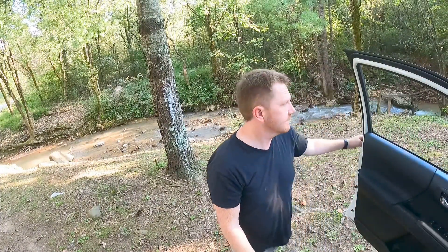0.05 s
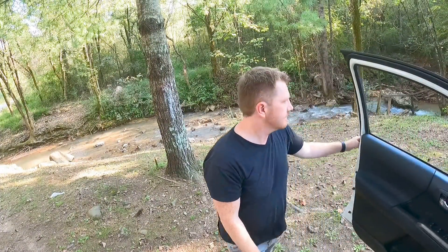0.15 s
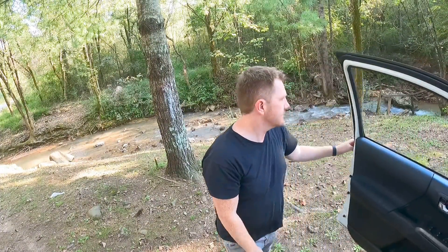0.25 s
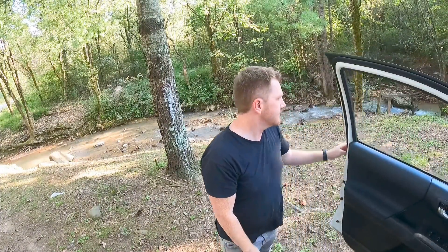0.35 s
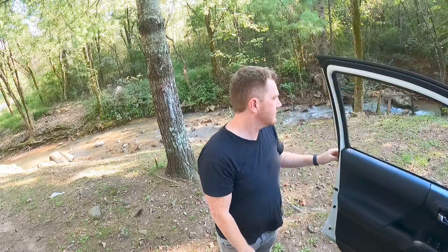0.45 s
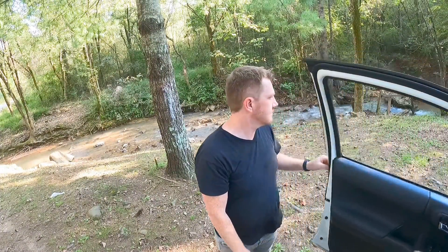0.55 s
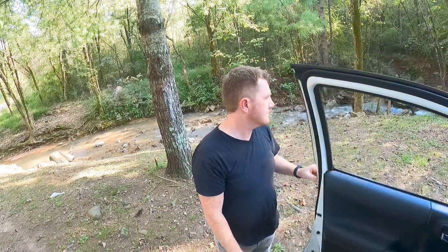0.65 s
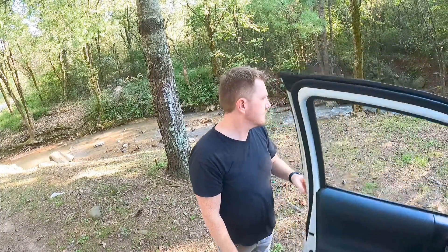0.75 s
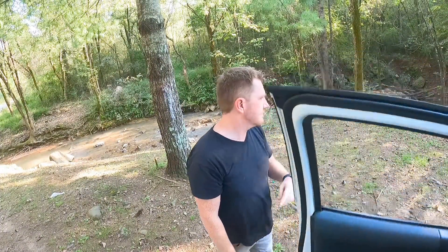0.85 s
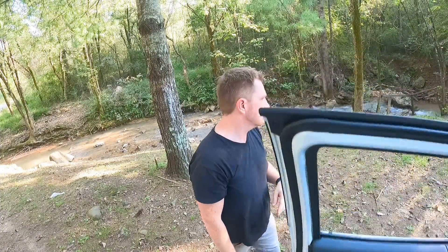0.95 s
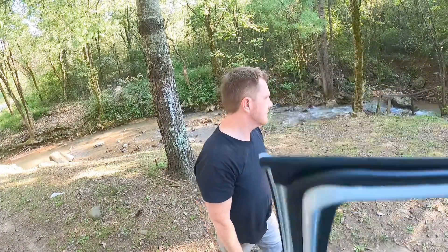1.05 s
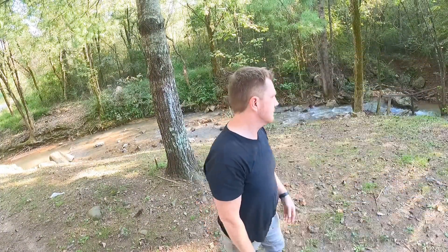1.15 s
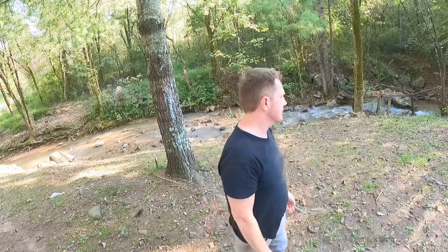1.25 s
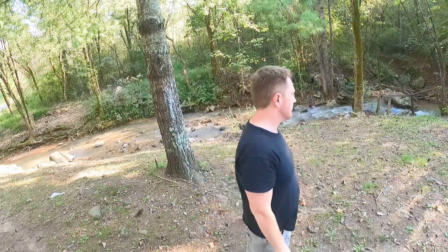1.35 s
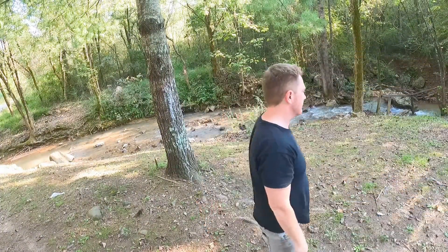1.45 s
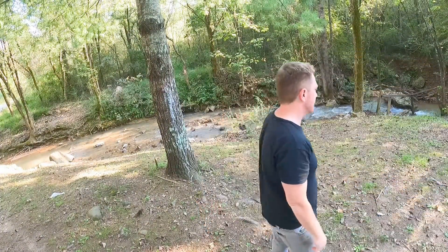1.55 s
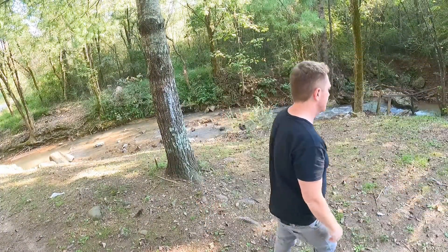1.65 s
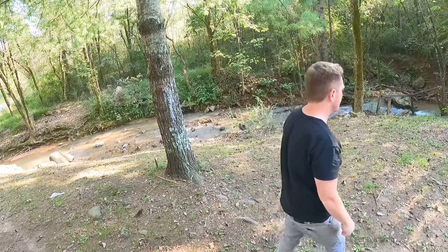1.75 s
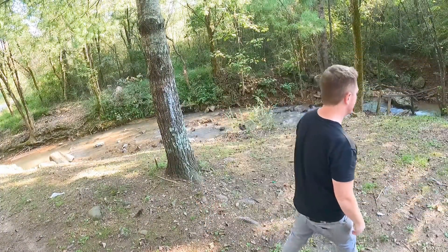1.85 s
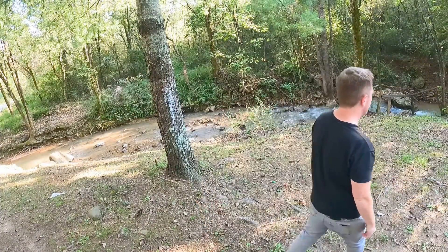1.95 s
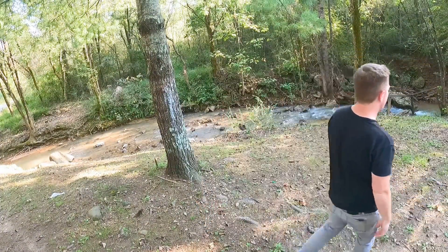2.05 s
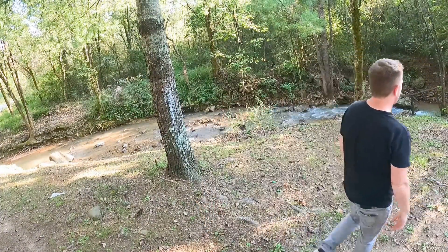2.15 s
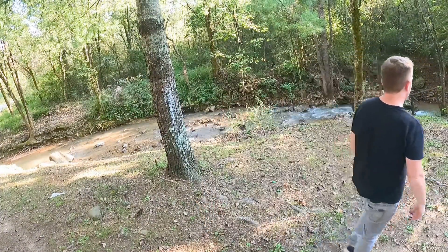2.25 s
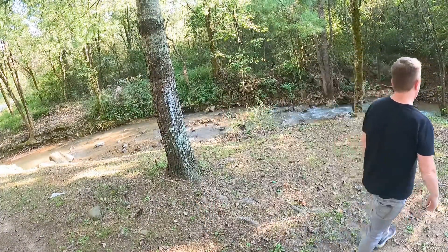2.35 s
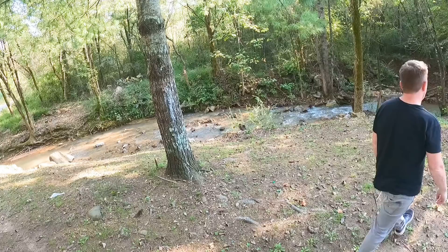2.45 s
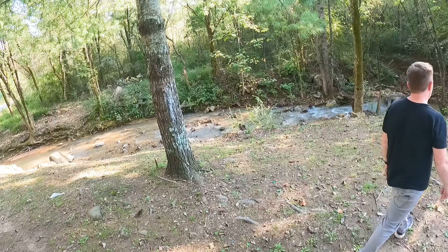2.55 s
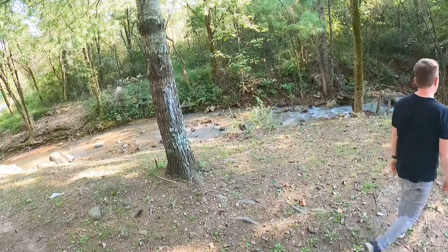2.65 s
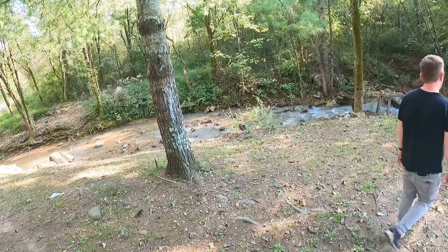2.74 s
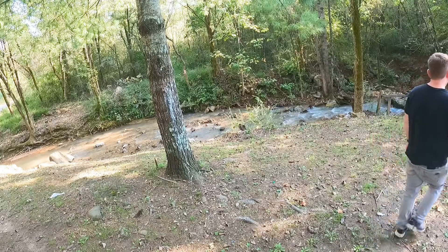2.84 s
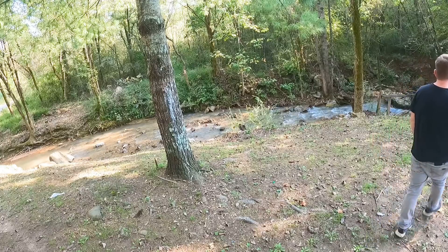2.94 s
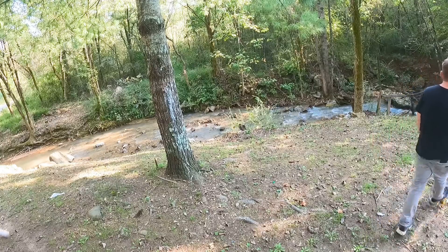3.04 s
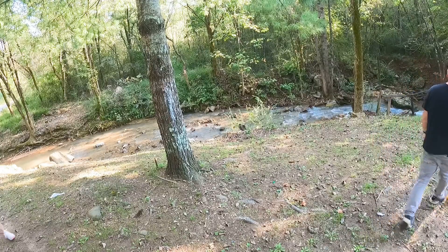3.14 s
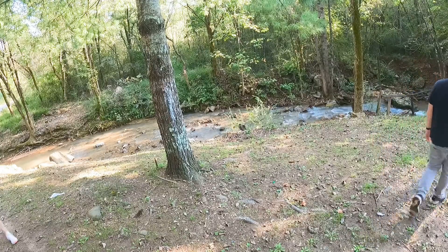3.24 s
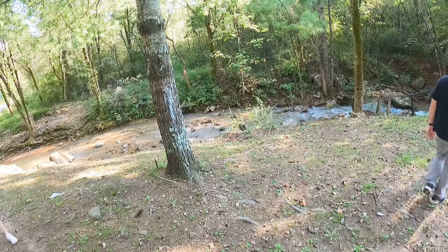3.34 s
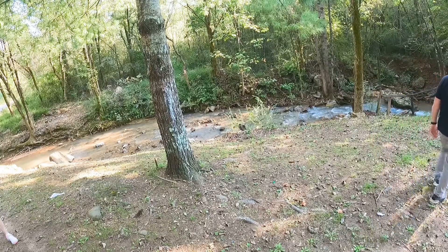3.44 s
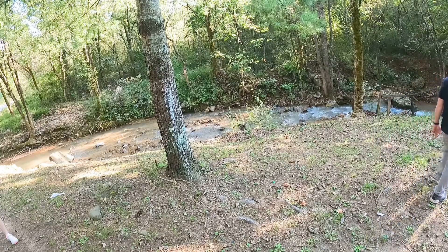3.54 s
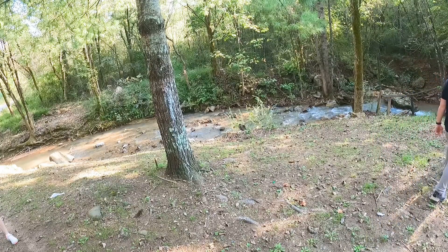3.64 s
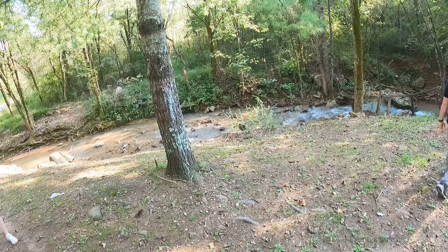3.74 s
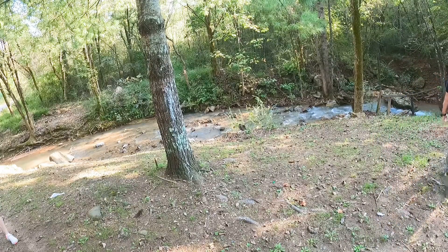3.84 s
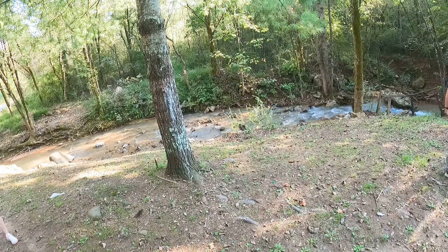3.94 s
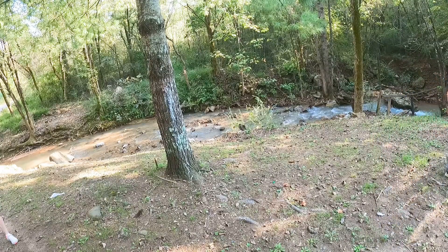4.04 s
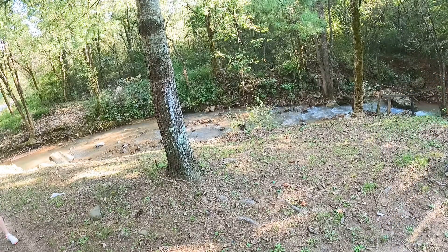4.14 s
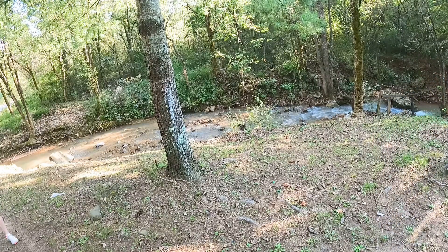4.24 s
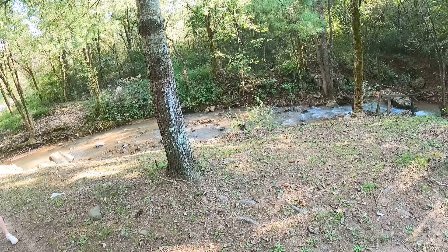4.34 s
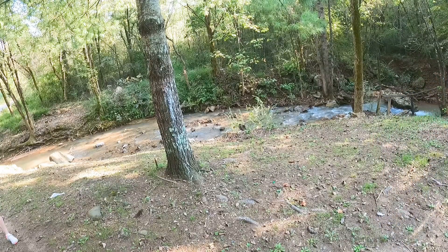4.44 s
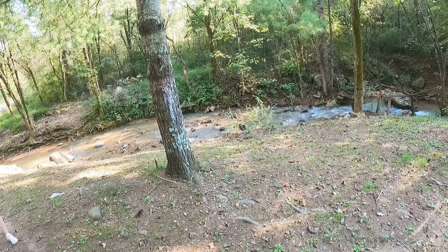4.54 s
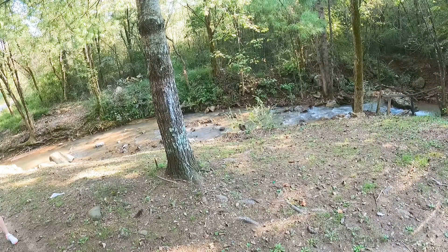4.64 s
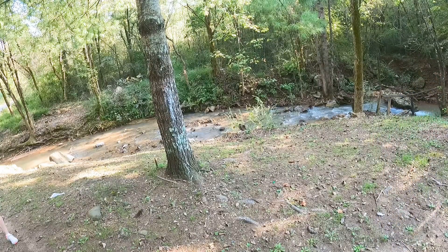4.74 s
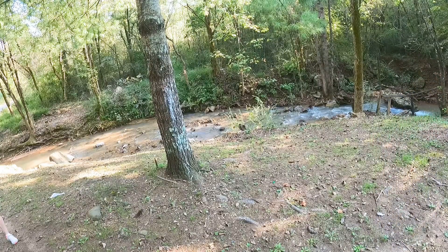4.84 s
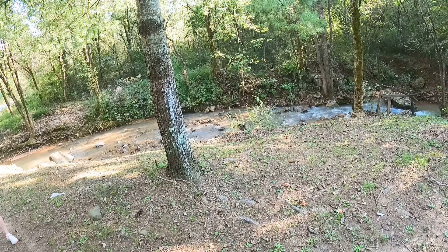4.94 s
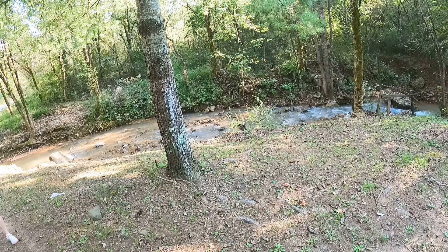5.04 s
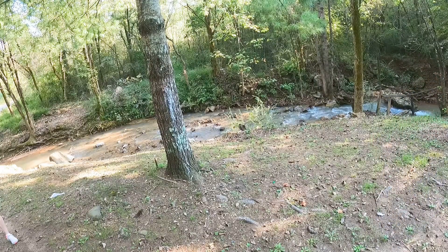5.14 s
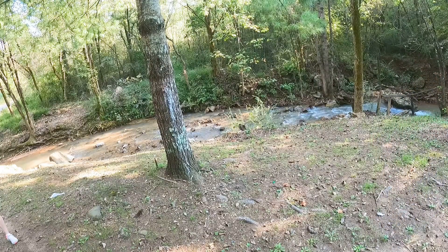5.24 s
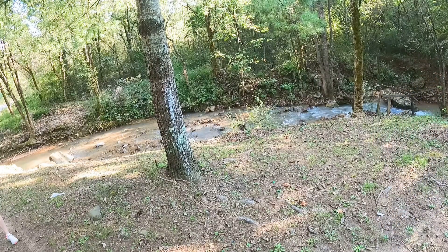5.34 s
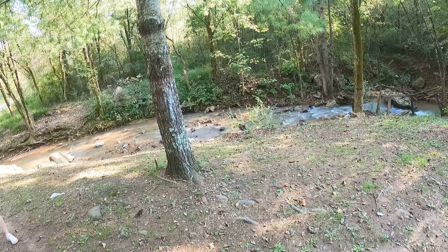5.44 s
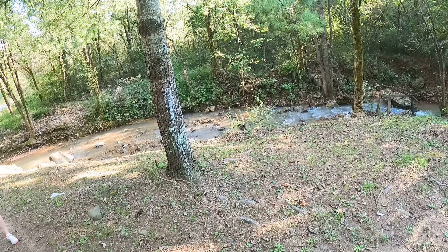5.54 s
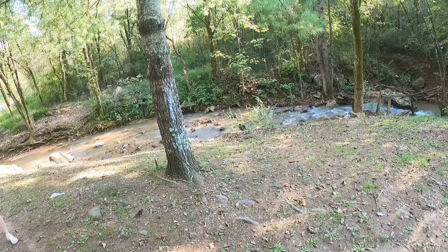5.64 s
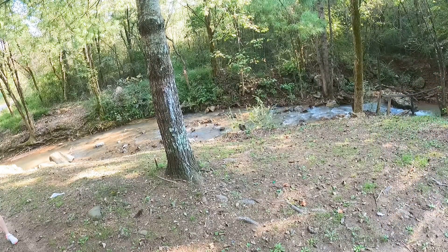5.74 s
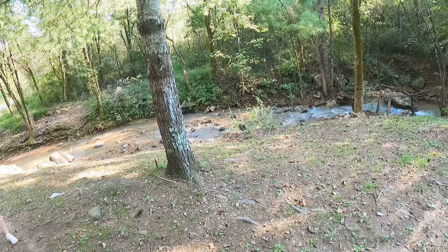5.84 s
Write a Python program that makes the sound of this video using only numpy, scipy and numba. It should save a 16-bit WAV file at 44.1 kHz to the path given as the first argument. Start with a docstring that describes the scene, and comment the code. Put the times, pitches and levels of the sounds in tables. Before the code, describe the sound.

A shallow creek rushes over stones throughout, a soft broadband wash with low rumble, bubbling and fine spray, slightly duller and narrower at first. Faint dry scuffs and cracks of leaf litter come around 0.3 to 0.6 seconds, a short low creak at 0.9, and a tiny microphone tap at 1.1. At about 1.35 a car door slams close by, slightly right: a quick latch clack, a heavy panel thud, brief trim rattle, and a deep cabin boom gone by about 1.8, with a short dull woodland tail. The camera's automatic gain dips the water, which creeps back as the image widens. Small grit or twig cracks tick at 1.6, 1.8, 3.25, 3.7 and 5.55. Light taps land toward the right at 3.1, 3.35, 4.35 and 5.1, with the strongest at 5.35. A faint far engine drones low, slowly growing and sinking in pitch. The stereo narrows at the end, near 5.9.

```python
"""A car door slams beside a shallow creek in the woods: latch, panel thud and cabin boom over rushing water.
Shoes scuff and crack the leaf litter, something creaks low, a far engine drones, and the camera is tapped.
Blows ring the door's modes; water is banded noise with rising bubble pings; the engine is two wavering tones;
scuffs and creak are short noise swells, and taps are slowing rings, stronger at the right port.
The camera's gain control ducks after the slam and creeps back; its stereo image opens and later closes."""
import sys
import numpy as np
from scipy import signal
from scipy.fft import rfft, irfft
from scipy.io import wavfile
from scipy.ndimage import uniform_filter1d
from numba import njit

SR = 44100
rng = np.random.default_rng(int(sys.argv[2]) if len(sys.argv) > 2 else 0)


def unload_audio(sound):
    """Save the sound as a 16-bit wav file, at the path given as the first command line argument."""
    columns = np.transpose(np.atleast_2d(sound))
    # keep every value between -1 and 1, then stretch to whole-number steps
    steps = np.round(np.clip(columns, -1, 1) * 32767)
    wavfile.write(sys.argv[1], SR, steps.astype(np.int16))


def linear_from_db(decibels):
    """Turn decibels (scalar or array-like) into linear amplitude factors; 0 gives 1."""
    return 10 ** (np.asarray(decibels, float) / 20)


N = 259749
T = np.arange(N) / SR  # seconds
BINS_HZ = np.maximum(np.fft.rfftfreq(N, 1 / SR), 1)

# Ringing modes of the door. Each row: pitch in Hz, relative level in dB, time to fall 60 dB in seconds.
DOOR_MODES = [(67.3, 7.5, 0.63), (100, -13, 0.33), (141.3, 9, 0.23), (190.6, -5.5, 0.26), (228, -1, 0.105),
              (281, 6, 0.046), (352, 1.5, 0.051), (433, -1, 0.048), (558, -0.5, 0.13), (627, 1, 0.051),
              (776, 3, 0.049), (905, 0, 0.057), (1144, -5.5, .035), (1277, -0.5, 0.038), (1460, 1, 0.021),
              (1620, -0.5, 0.022), (1900, -6.5, 0.02), (2050, -12, .03), (2320, -18, 0.016),
              (2570, -4.5, 0.029), (2830, 1, 0.017), (3090, -7, .025), (3750, -4.5, 0.012),
              (4200, -21, 0.01), (4660, -1, 0.03), (5300, 0, 0.049), (6600, -9, 0.02), (8000, -12, .02),
              (11000, -14, .015)]
# Latch catches, door meets seal, trim rattles.
# Each row: start in seconds, strength in dB, centre of the blow in Hz, rattle level in dB.
BLOWS = [(1.3415, -12, 1710, -24), (1.347, -16, 1260, -28), (1.3525, -21, 1040, -18),
         (1.3570, -12.5, 1900, -14.5), (1.3604, -7, 290, -27), (1.3649, -19.5, 260, -27),
         (1.3820, -21.5, 890, -21), (1.386, -19, 108, -20), (1.3920, -21.5, 900, -26.5),
         (1.4010, -23, 306, -40), (1.4170, -22, 201, -33), (1.433, -28, 1500, -31)]
# Colour of the shaken trim. Each row: frequency in Hz, relative level in dB per Hz.
RATTLE_COLOUR = [(180, -17), (300, -13), (647, -8), (913, -4.5), (1060, -9.5), (2820, -14.5), (5710, -30),
                 (6300, -25), (15000, -56)]
# The shut cabin heaves on its air and springs.
# Each row: start in seconds, pitch in Hz, level in dB, length in seconds.
CABIN_HEAVES = [(1.3745, 19.2, -6, .34)]
# Air squeezed out past the seal.
# Each row: start in seconds, first pitch in Hz, last pitch in Hz, glide in seconds, level in dB, length in seconds.
SEAL_PUFFS = [(1.3635, 120, 48, .008, -9, .045)]
# The body panels boom loosely. Each row: start in seconds, centre in Hz, level in dB, length in seconds.
PANEL_BOOMS = [(1.385, 82, -18, 0.26)]
# Shoes dragging in the litter, and one low creak near 500 Hz.
# Each row: start in seconds, length in seconds, level in dB, centre in Hz, width in octaves.
SCUFFS_AND_CREAK = [(.33, 0.081, -48.5, 3980, 0.65), (0.442, 0.14, -44, 4280, 0.74),
                    (0.89, 0.059, -31.5, 497, 0.29), (1.28, .03, -64, 11500, .3),
                    (3.074, 0.12, -56, 10000, 0.43)]
# Twigs and grit cracking. Each row: start in seconds, level in dB, pitch in Hz.
CRACKS = [(0.337, -32, 1520), (.385, -34, 4900), (0.458, -28.5, 3950), (1.6057, -36, 8000),
          (1.7756, -31, 7500), (3.251, -27, 4050), (3.700, -32, 4400), (5.5615, -28, 3900)]
# Small taps on the housing. Each row: start in seconds, relative level in dB.
TAPS = [(1.0943, -18), (3.1144, -11), (3.3418, -23), (4.3658, -25), (5.1158, -17), (5.3494, 0)]
# Colour of the rushing water. Each row: frequency in Hz, relative level in dB per Hz.
CREEK_COLOUR = [(15, -31), (27, -6.5), (53, 1), (113, -5.5), (210, -6.5), (433, -11), (945, -15),
                (2630, -28.5), (4500, -29), (7300, -36.5), (8600, -44), (12500, -53.5), (14000, -60),
                (15600, -70)]
# Spread of the water to the sides. Each row: frequency in Hz, side noise against mid noise in dB.
CREEK_SIDE = [(30, -50), (120, -53), (250, -28), (500, -18), (1000, -13.5), (2200, -4), (4000, -20.5),
              (8000, -7.5), (13000, -2.5)]
# How the low rumble comes and goes. Each row: time in seconds, level change in dB.
RUMBLE_LEVEL = [(0, -1), (.5, -2.5), (1.2, -1), (2.1, 1.5), (2.7, 2), (3.3, 0), (3.8, 0), (4.4, -1),
                (5.3, -2.5), (5.89, -2)]
# Light gusts on the ports. Each row: start in seconds, length in seconds, level in dB.
GUSTS = [(.76, 1.6, -46), (4.27, .3, -58), (4.87, .16, -58)]
# Broad low hums. Each row: centre in Hz, width in Hz, rms in dB before the rumble level.
HUMS = [(51.8, 18.6, -37.5), (87.3, 8.5, -42)]
# Engine tones. Each row: multiple of the turning rate, starting rms in dB before waver and pan.
ENGINE_TONES = [(4, -45.5), (5, -44.5)]
# Phase between the ports. Each row: frequency in Hz, lead of the left port in radians.
PORT_PHASE = [(150, 0), (780, 0.143), (2240, -0.71), (3010, -0.67), (5170, -0.48), (5940, -0.74),
              (7750, 0.22), (8350, 0.92), (8790, 0.13), (11500, 0.0), (12100, 1), (15300, 0.064)]

LITTER_TOP_HZ = 13800  # the scuffs fade above this
# A tap is a ring whose swings each last longer than the one before.
TAP_FIRST_S, TAP_STRETCH, TAP_SWINGS, TAP_DB, TAP_INWARD = .0005, 2.68, 4, -11, .38
CREEK_DB = -30  # rms of the mid water before its level changes
# The open door screens off the creek until it swings away.
SCREEN_HISS_DB, SCREEN_RUSH_DB, SCREEN_GONE_S = -3.5, -1, 1.35
ENGINE_HZ, ENGINE_SINK_HZ_PER_S, ENGINE_NEARS_DB_PER_S = 38.86, .72, 1.12
ENGINE_WAVER_DB, ENGINE_PAN_DB = 1.6, 0.5  # pan is left over right
# The stereo image starts narrow, opens, then closes again; the water's hiss dulls as it closes.
NARROW_START, OPENS_S, CLOSES_AT_S, CLOSES_S = 0.71, 3.1, 5.47, .4
NARROW_SIDE_DB, NARROW_HISS_DB = -20, -5  # change per unit of narrowness
# Gain control: knee and deepest cut, smoothing of the loudness, then smoothing of the cut.
GAIN_KNEE_DB, GAIN_DEPTH_DB = -26, 9.5
LOUDNESS_RISE_S, LOUDNESS_FALL_S = 0.15, 0.13
GAIN_ATTACK_S, GAIN_RETURN_S = .07, 0.6


def level(x, db):
    """Scale to an rms level."""
    return x * linear_from_db(db) / np.sqrt(np.mean(x ** 2))


def colour(table, hz):
    """Read a (Hz, value) table on a log-frequency axis."""
    f, v = np.transpose(table)
    return np.interp(np.log(hz), np.log(np.maximum(f, 1)), v)


def noise(gain):
    """Noise of rms 1 with the given gain per frequency bin."""
    return level(irfft(gain * rfft(rng.standard_normal(N)), N), 0)


def bell(hz, centre_hz, octaves):
    """Bell-shaped weight on a log-frequency axis."""
    return np.exp(-.5 * (np.log2(hz / centre_hz) / octaves) ** 2)


def walk(rate):
    """Random levels held 1 / rate seconds and slewed twice; spread 1."""
    k = int(SR / rate)
    held = np.repeat(rng.standard_normal(N // k + 1), k)
    w = uniform_filter1d(uniform_filter1d(held, k), k)[:N]
    return w / w.std()


def early_swell(s, length):
    """A half-sine swell that peaks early and is silent outside its length."""
    return np.sin(np.pi * np.sqrt(np.clip((T - s) / length, 0, 1)))


@njit
def grains(at, hz, cycles, glide, size, out):
    """Add short decaying pings whose pitch rises when glide is above zero."""
    for k in range(len(at)):
        z, w = size[k] + 0j, 2 * np.pi * hz[k] / SR
        for i in range(at[k], min(at[k] + int(3 * cycles[k] * SR / hz[k]), len(out))):
            out[i] += z.imag
            z *= np.exp(1j * w - 2 * hz[k] / SR / cycles[k])
            w *= 1 + glide * hz[k] / SR / cycles[k]
    return out


@njit
def follow(x, attack, release):
    """Smooth a curve, with one rate for rising and another for falling."""
    e, out = x[:4000].mean(), np.empty(len(x))
    for i in range(len(x)):
        e += (x[i] - e) * (attack if x[i] > e else release)
        out[i] = e
    return out


def blows():
    """Each blow rings the door modes near its own centre and shakes loose trim."""
    ring, shake = np.zeros(N), np.zeros(N)
    a, b = int(1.3 * SR), int(2.2 * SR)  # only this stretch is worked out
    t = T[a:b, None]
    hz, mode_db, t60 = np.transpose(DOOR_MODES)
    chance = rng.standard_normal((len(BLOWS), 2, len(DOOR_MODES)))
    for (s, db, centre_hz, rattle_db), (level_luck, phase_luck) in zip(BLOWS, chance):
        since = np.clip(t - s, 0, None)
        gain = linear_from_db(db + mode_db + 0.95 * level_luck) * bell(hz, centre_hz, 0.7)
        # high modes start out of step, low ones push together
        phase = phase_luck * np.clip(hz / 700 - .5, 0, 3)
        contact = 1 - np.exp(-since / 0.00042)  # rubber and grease soften the touch
        decay = np.exp(-np.log(1000) * since / t60)
        ring[a:b] += contact * decay * np.sin(2 * np.pi * hz * since + phase) @ gain
        shake[a:b] += (contact * linear_from_db(rattle_db) * np.exp(-since / 0.0052))[:, 0]
    return ring + shake * noise(linear_from_db(colour(RATTLE_COLOUR, BINS_HZ)))


def heave(s, hz, length):
    """A few slow swings under one swell, as the cabin air swells before it dies."""
    t = np.clip(T - s, 0, length)
    return np.sin(np.pi * (t / length) ** 0.65) ** 2 * np.sin(2 * np.pi * hz * t)


def seal_puff(s, from_hz, to_hz, glide, length):
    """Air squeezed past the seal: a short swing whose pitch glides from one value toward another."""
    since = np.clip(T - s, 0, None)
    turns = to_hz * since + (from_hz - to_hz) * glide * (1 - np.exp(-since / glide))
    return -np.sin(2 * np.pi * turns) * early_swell(s, length)


def panel_boom(s, hz, length):
    """Loose body panels: low noise under one swell."""
    return noise(bell(BINS_HZ, hz, 0.59)) * early_swell(s, length)


def door():
    """The slam: struck modes and trim, then cabin air, seal and loose panels booming."""
    out = blows()
    for s, hz, db, length in CABIN_HEAVES:
        out += linear_from_db(db) * heave(s, hz, length)
    for s, from_hz, to_hz, glide, db, length in SEAL_PUFFS:
        out += linear_from_db(db) * seal_puff(s, from_hz, to_hz, glide, length)
    for s, hz, db, length in PANEL_BOOMS:
        out += linear_from_db(db) * panel_boom(s, hz, length)
    return out


def woods(x):
    """Trunks and bank scatter a short dull tail back, different at each port."""
    t = T[:SR // 2]
    tail = rng.standard_normal((2, len(t))) * np.exp(-np.log(1000) * t / .4) * (t > .008)
    tail = signal.sosfilt(signal.butter(1, [80, 2500], "band", fs=SR, output="sos"), tail)
    tail = tail[0] + 0.35 * tail[1] * np.array([[1], [-1]])
    return linear_from_db(-38) * signal.fftconvolve(x[None], tail, axes=1)[:, :N]


def scuffs_creak_and_cracks():
    """Litter drags and one low creak as swells of flickering noise, and single cracks as short pings."""
    out = np.zeros(N)
    for s, length, db, hz, octaves in SCUFFS_AND_CREAK:
        swell = np.sin(np.pi * np.clip((T - s) / length, 0, 1))
        flicker = linear_from_db(db + 1.5 * walk(200))
        tone = bell(BINS_HZ, hz, octaves) / (1 + (BINS_HZ / LITTER_TOP_HZ) ** 12)
        out += flicker * swell * noise(tone)
    s, db, hz = np.transpose(CRACKS)
    return out + grains((s * SR).astype(np.int64), hz, 8.7 + 0 * hz, 0., linear_from_db(db), np.zeros(N))


def tap(t):
    """A sharp inward tick that slows into a thump; inward swings go deeper than outward ones."""
    swings = np.log(1 + np.clip(t, 0, None) * (TAP_STRETCH - 1) / TAP_FIRST_S) / np.log(TAP_STRETCH)
    ring = np.sin(np.pi * np.minimum(swings, TAP_SWINGS))
    return -linear_from_db(TAP_DB) * (ring + TAP_INWARD * abs(ring))


def taps():
    """Every tap lands nearer the right port; the housing rounds its edge."""
    soft = uniform_filter1d(sum(linear_from_db(db) * tap(T - s) for s, db in TAPS), size=4)
    return uniform_filter1d(soft, size=4) * linear_from_db([[-7], [1.5]])


def narrowness():
    """How narrow the stereo image is while it opens, and while it closes: 0 is fully open."""
    opening = NARROW_START * np.clip(1 - T / OPENS_S, 0, 1) ** 1.85
    closing = np.clip((T - CLOSES_AT_S) / CLOSES_S, 0, 2)
    return opening, closing


def bubbles(count, lo_hz, hi_hz, cycles, spread_db):
    """Air pockets closing among the stones, a few much louder than most."""
    when, pitch, luck = rng.random((count, 3)).T
    hz = lo_hz * (hi_hz / lo_hz) ** pitch
    size = linear_from_db(-spread_db * np.log(1 - luck)) * np.sqrt(hz / lo_hz)
    at = (when * N).astype(np.int64)
    return level(grains(at, hz, cycles + 0 * hz, 0.14, size, np.zeros(N)), 0)


def creek():
    """Half-octave bands of rush that swell together and flicker alone, with bubbles and spray on top."""
    screened = T < SCREEN_GONE_S
    hiss_db = .5 + SCREEN_HISS_DB * screened + NARROW_HISS_DB * np.minimum(narrowness()[1], .6)
    rush_db = -.5 + SCREEN_RUSH_DB * screened
    rumble_db = np.interp(T, *np.transpose(RUMBLE_LEVEL))
    shape = linear_from_db(colour(CREEK_COLOUR, BINS_HZ))
    water = rng.standard_normal(N)
    water += linear_from_db(-16.5) * bubbles(count=1500, lo_hz=389.0, hi_hz=2810, cycles=3.4, spread_db=1.05)
    water += linear_from_db(-9) * bubbles(count=6000, lo_hz=2850, hi_hz=13000, cycles=7.1, spread_db=1.6)  # spray
    mid = rfft(water) * shape
    side = rfft(rng.standard_normal(N)) * shape * linear_from_db(colour(CREEK_SIDE, BINS_HZ))
    pair, out, swell = np.array([mid + side, mid - side]), 0, walk(4.92)
    octave = np.log2(BINS_HZ / 16)
    for k in np.arange(0, 10.5, .5):
        low = np.clip((4.5 - k) / 1.5, 0, 1)  # the rumble is what lies below about 200 Hz
        high = np.clip((k - 5.5) / 2, 0, 1)  # the hiss takes over above about 1.5 kHz
        db = low * rumble_db + (1 - low - high) * rush_db + high * hiss_db
        db = db + 0.12 * swell + 0.74 * walk(8.2)
        out = out + linear_from_db(db) * irfft(pair * np.clip(1 - 2 * abs(octave - k), 0, 1), N)
    return out * linear_from_db(CREEK_DB) / np.std(irfft(mid, N))


def breeze():
    """Slow air pressure, opposite at the two ports."""
    gusts = 0
    for s, length, db in GUSTS:
        gusts = gusts + linear_from_db(db) * np.sqrt(abs(np.sin(np.pi * np.clip((T - s) / length, 0, 1))))
    return gusts * noise(bell(BINS_HZ, 35, 0.56)) * np.array([[1], [-1]])


def hums():
    """Broad low hums: noise around each centre, moving with the rumble level."""
    out = np.zeros(N)
    for hz, width, db in HUMS:
        out += linear_from_db(db) * noise(1 / np.sqrt(1 + (2 * (BINS_HZ - hz) / width) ** 4))
    return linear_from_db(np.interp(T, *np.transpose(RUMBLE_LEVEL))) * out


def engine():
    """A far engine: multiples of a sinking, unsteady turning rate that waver and slowly grow."""
    turns = np.cumsum((ENGINE_HZ - ENGINE_SINK_HZ_PER_S * T) * (1 + 0.0041 * walk(6))) / SR
    tones = np.zeros(N)
    for k, db in ENGINE_TONES:
        waver = linear_from_db(db + ENGINE_WAVER_DB * walk(3.055))
        tones += waver * np.sqrt(2) * np.sin(2 * np.pi * k * turns)
    return linear_from_db(ENGINE_NEARS_DB_PER_S * T + ENGINE_PAN_DB * np.array([[.5], [-.5]])) * tones


def scene():
    """Everything at the two ports; the door is a little to the right, its deepest boom comes from all round."""
    slam = door()
    aside = linear_from_db(-15) * signal.sosfilt(signal.butter(2, 130, "high", fs=SR, output="sos"), slam)
    slam_pair = slam + aside * np.array([[-1], [1]]) + woods(slam)
    return slam_pair + scuffs_creak_and_cracks() + taps() + creek() + breeze() + hums() + engine()


def port_phase(x):
    """Turn the phase of the two ports apart, half of the difference on each."""
    turn = np.exp(.5j * colour(PORT_PHASE, BINS_HZ))
    return irfft(rfft(x) * np.array([turn, turn.conj()]), N)


def stereo_width(x):
    """Narrow the image by turning the side signal down, its treble less than the rest."""
    side, width_db = (x[0] - x[1]) / 2, NARROW_SIDE_DB * sum(narrowness())
    top = irfft(rfft(side) * np.clip(BINS_HZ / 2000 - 3, 0, 1), N)
    side = (side - top) * linear_from_db(width_db) + top * linear_from_db(0.35 * width_db)
    return x.mean(axis=0) + side * np.array([[1], [-1]])


def gain_control(x):
    """Loud sound pulls the gain down, at most by a set depth, and it returns slowly."""
    power = uniform_filter1d(np.mean(x ** 2, axis=0), size=2000, origin=999)  # window trails behind
    loud_db = 10 * np.log10(follow(power, 1 / (LOUDNESS_RISE_S * SR), 1 / (LOUDNESS_FALL_S * SR)))
    cut_db = np.clip(0.91 * (loud_db - GAIN_KNEE_DB), 0, GAIN_DEPTH_DB)
    cut_db = follow(cut_db, 1 / (GAIN_ATTACK_S * SR), 1 / (GAIN_RETURN_S * SR))
    return x * linear_from_db(-cut_db)


def low_pass(x):
    """Removes everything above the highest recorded frequency."""
    return signal.sosfilt(signal.butter(12, 15720, fs=SR, output="sos"), x)


def record(dry):
    """The camera sets port phase, stereo width and gain, then rounds the peaks."""
    x = gain_control(stereo_width(port_phase(dry)))
    mix = 0.81 * np.tanh(x / 0.9)
    return low_pass(mix)


dry = scene()
out = record(dry)
unload_audio(out)
```